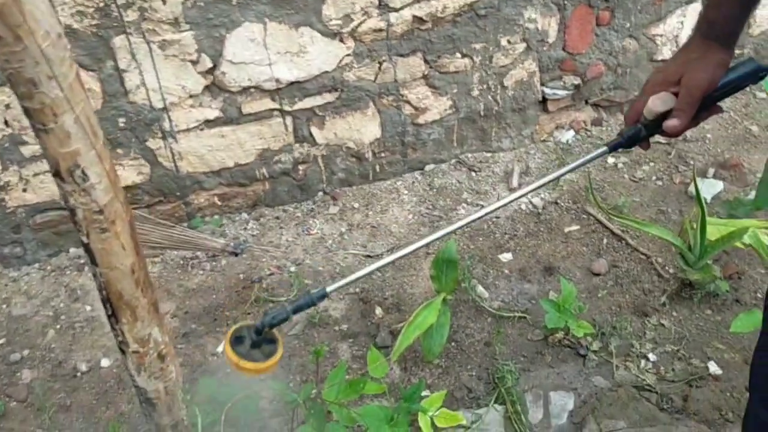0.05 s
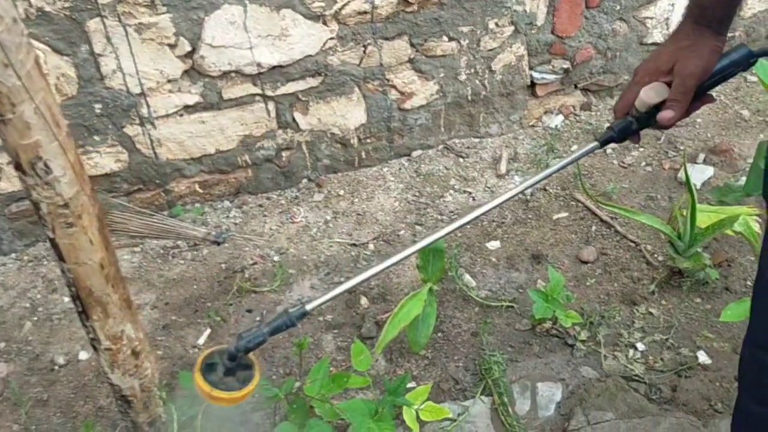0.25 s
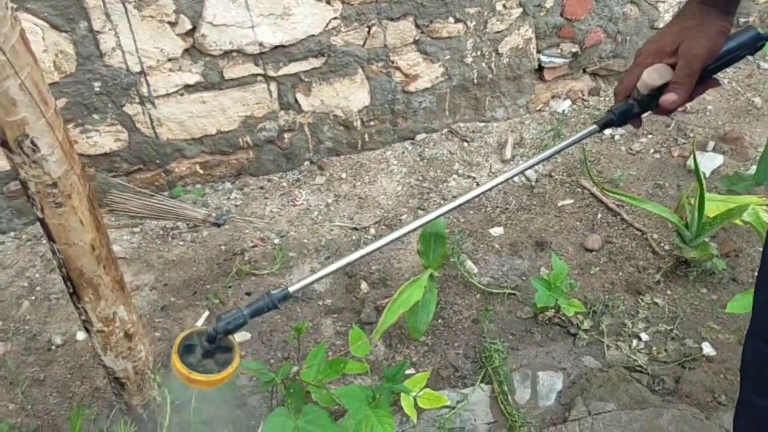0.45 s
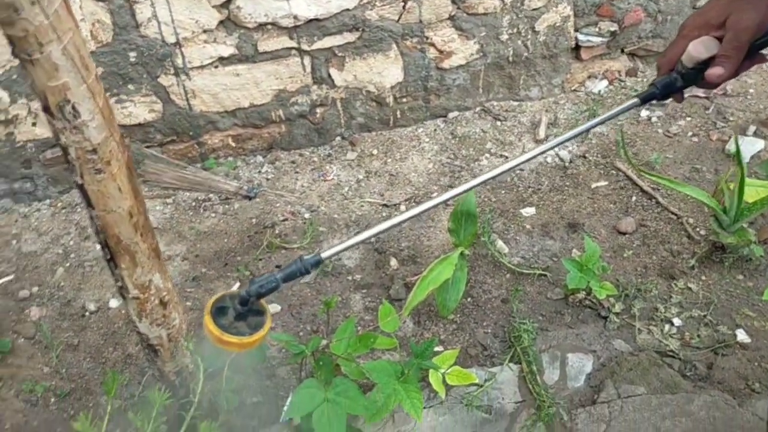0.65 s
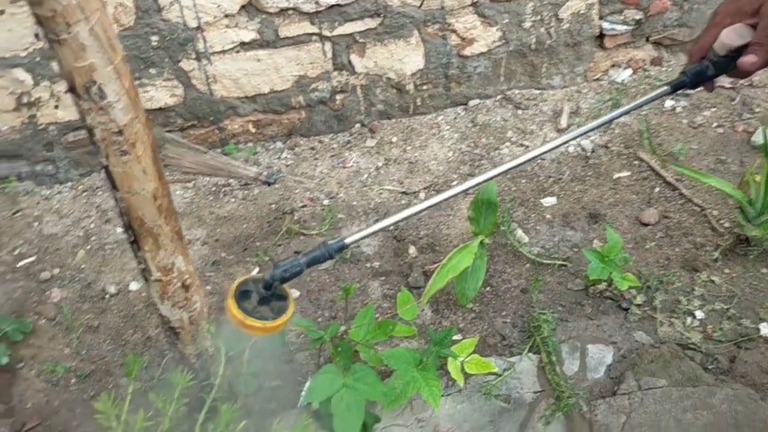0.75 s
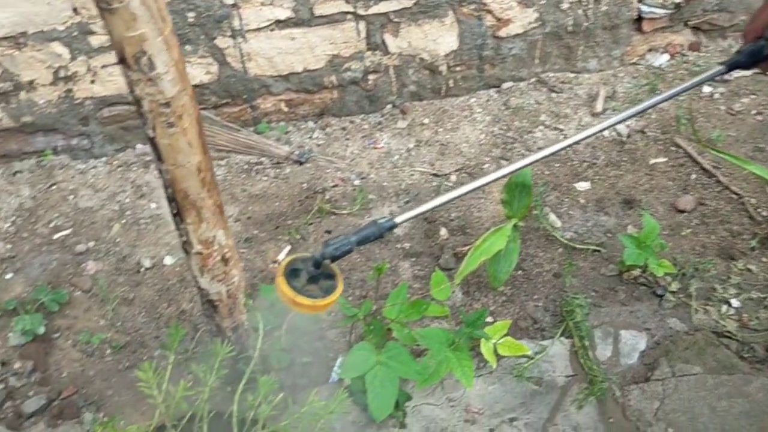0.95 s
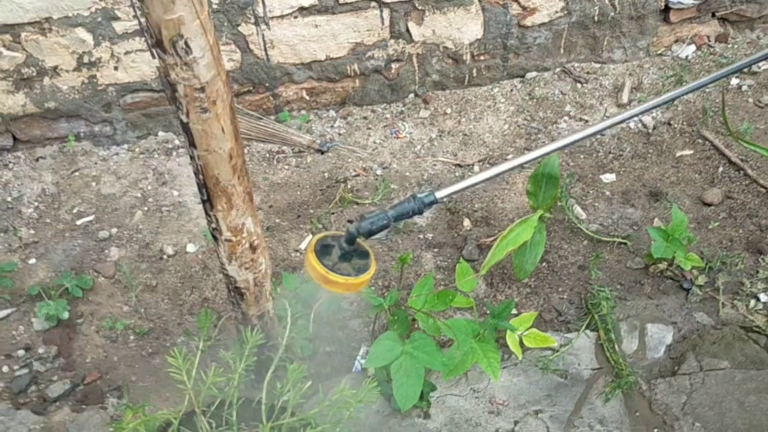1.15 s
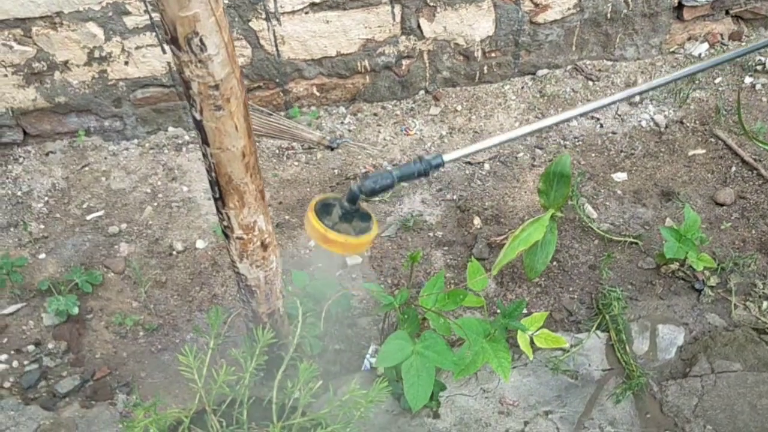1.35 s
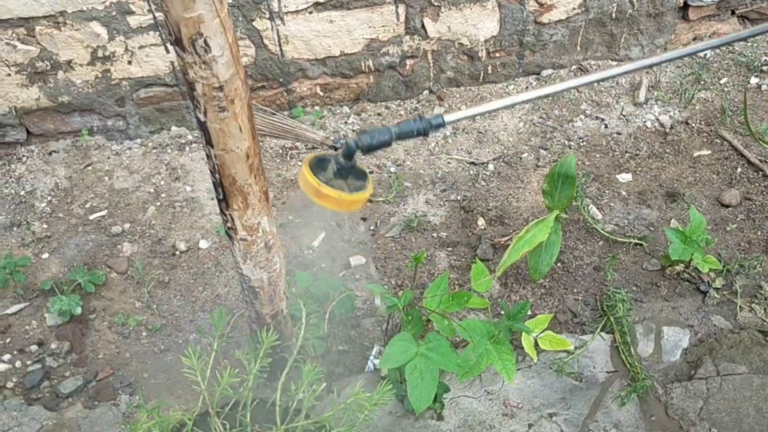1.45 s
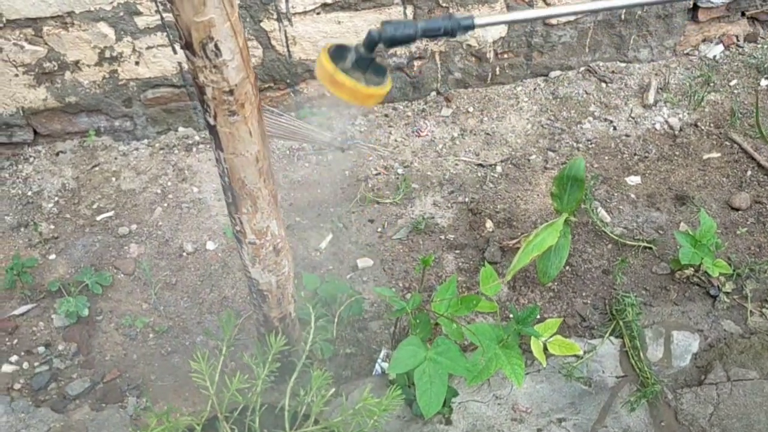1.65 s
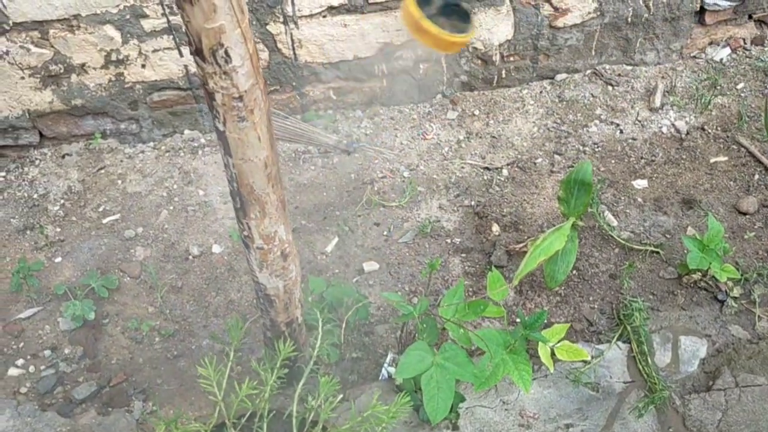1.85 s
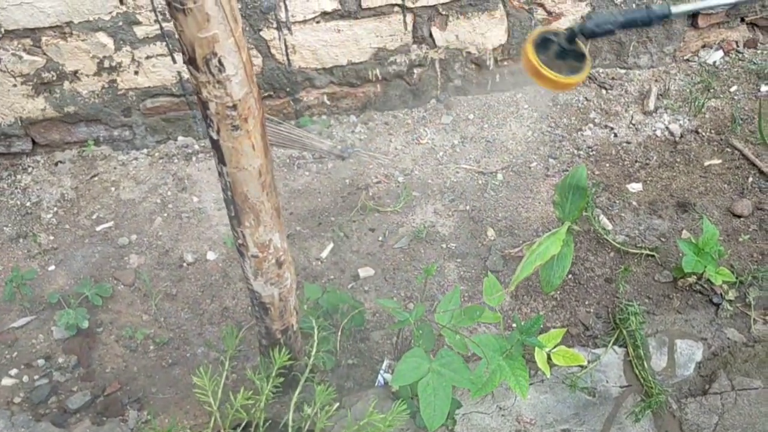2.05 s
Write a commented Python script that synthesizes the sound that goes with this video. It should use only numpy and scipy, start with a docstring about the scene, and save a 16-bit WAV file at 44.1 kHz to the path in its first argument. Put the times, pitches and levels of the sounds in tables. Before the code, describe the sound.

A small electric sprayer pump buzzes throughout the two seconds, a fast, even ticking hum with a soft hiss of mist. At about 0.3 seconds the wand clacks twice and the tank bumps dully. The spray hisses harder from then until about 0.7 seconds. A few faint knocks fall between 0.6 and 1.2 seconds. A low outdoor rumble lies underneath, with no echo.

```python
"""The rapid beat of a small electric diaphragm pump, about 45 strokes a second, driving a garden sprayer.
Each stroke thuds in the housing and ticks in the valves; the tank hums and the nozzle hisses mist.
Early on the lance clacks twice and the jet hisses harder for a while; the tank bumps and a few
light knocks follow. Outdoors among plants: one microphone, no echo, a low rumble underneath."""
import sys
import numpy as np
from scipy import signal
from scipy.fft import rfft, irfft
from scipy.io import wavfile

SR = 44100
rng = np.random.default_rng(int(sys.argv[2]) if len(sys.argv) > 2 else 0)


def output_pcm(signal):
    """Save a mono or channel-first signal as 16-bit PCM at the path in sys.argv[1].

    Samples are clipped to [-1, 1] before scaling.
    """
    pcm = np.clip(np.atleast_2d(signal).T, -1, 1) * 32767
    wavfile.write(sys.argv[1], SR, np.round(pcm).astype(np.int16))


N = 92610
TIME = np.arange(N) / SR

# housing and upper hum, as the sprayer is moved about: time_s, gain_db
PUMP_LEVEL = [(0, -3), (.18, -0.5), (.45, 0), (.62, 0.5), (.9, -2), (1.25, 0), (1.5, -2), (1.8, -4),
              (1.95, -1), (2.1, -2.5)]
# valve ticks and gush of water: time_s, gain_db
VALVE_LEVEL = [(0, -1), (.18, 2.5), (.45, 4), (.62, 4.5), (.9, 4), (1.25, 3), (1.5, 1), (1.8, -1),
               (1.95, 1.5), (2.1, -0.5)]
# clacks of the lance: start_s, gain_db, ringing_gain, treble_db
CLACKS = [(0.251, -5, 1, 1), (0.2543, 0.5, 0.75, 0), (0.264, -10.5, .35, 8), (0.2713, -7, 0.41, -1),
          (0.2844, -6.5, 0.56, -2), (0.3232, -6, 0.58, -6), (0.3321, -11, 0.25, -13),
          (0.3663, -17, 0.27, 4.5), (1.581, -22, 0.55, 2)]


def from_db(db):
    """Decibels to gain."""
    return 10 ** (np.asarray(db) / 20)


def curve(rows):
    """Straight lines in time through the rows."""
    return np.interp(TIME, *np.transpose(rows))


def butter(x, order, edges_hz, kind):
    """Butterworth filter: low, high or band pass."""
    return signal.sosfilt(signal.butter(order, edges_hz, kind, fs=SR, output="sos"), x)


def noise(spectrum):
    """Noise of rms 1 with the given colour, falling away beyond its ends."""
    hz, db = np.transpose(spectrum)
    f = np.maximum(np.arange(N // 2 + 1) * SR / N, 1)
    colour = from_db(np.interp(np.log(f), np.log(hz), db))
    skirts = np.minimum(f / hz[0], 1) ** 2 * np.minimum(hz[-1] / f, 1) ** 2
    x = irfft(rfft(rng.standard_normal(N)) * colour * skirts, N)
    return x / x.std()


def drift(rate_hz):
    """Random wander of spread 1, mostly slower than the rate."""
    f = np.arange(N // 2 + 1) * SR / N
    x = irfft(rfft(rng.standard_normal(N)) / (1 + (f / rate_hz) ** 2), N)
    return (x - x.mean()) / x.std()


def clicks(times, gains):
    """One impulse at each time."""
    at = np.round(np.asarray(times) * SR).astype(int)
    inside = (at >= 0) & (at < N)
    return np.bincount(at[inside], (gains * np.ones(len(at)))[inside], N)


def ring(hits, hz, t60, rise_s):
    """A mode that swells quickly and dies away after every impulse."""
    envelope = np.exp(-np.log(1000) * TIME / t60) * (1 - np.exp(-TIME / rise_s))
    return signal.fftconvolve(hits, np.sin(2 * np.pi * hz * TIME) * envelope)[:N]


def strike(times, gains, modes, rise_s, spread_db):
    """Blows on a body; each meets every mode with a strength of its own."""
    out = 0
    for hz, db, t60 in modes:
        strengths = gains * from_db(db + spread_db * rng.standard_normal(len(times)))
        out += ring(clicks(times, strengths), hz, t60, rise_s)
    return out


def bursts(times, gains, decay_s):
    """An envelope that jumps at each time and decays; overlaps add in power."""
    feedback = np.exp(-2 / (decay_s * SR))
    power = signal.lfilter([1], [1, -feedback], clicks(times, gains ** 2) + 1e-18)
    return np.sqrt(power)


def surge(strokes, depth):
    """A gain around 1 that jumps with every stroke."""
    pulses = bursts(strokes, 1, decay_s=0.0054)
    return 1 + depth * (pulses / pulses.mean() - 1)


def rumble():
    """Low outdoor rumble with two brief swells."""
    spectrum = [(30, -34.5), (62, -34), (90, -19.5), (135, -1), (230, 5), (340, -3), (600, -2.5),
                (1200, -17.5)]  # its colour: frequency_hz, density_db
    level = [(0, -38), (.18, -45), (.25, -24.5), (.3, -32), (.4, -34.5), (.48, -36), (.8, -40),
             (1.08, -42.5), (1.17, -32.5), (1.27, -44), (1.7, -43), (2.1, -45.5)]  # its course: time_s, level_db
    return noise(spectrum) * from_db(curve(level))


def knocks():
    """Light knocks: a tick and a hollow body, rounded off by the softness of the contact."""
    blows = [(0.6318, -17, -13, 8000), (0.6436, -25, -28, 4000), (0.791, -15, -17.5, 1300),
             (.8015, -34, -26, 1200), (0.9344, -16, -26, 2800), (1.1263, -13.5, -23, 2300),
             (1.1386, -21, -27, 4500)]  # each contact: start_s, tick_db, body_db, cutoff_hz
    tick_modes = [(1470, -1.5, 0.0053), (1960, 1, 0.0031), (3060, -3.5, 0.0017), (3970, 1, .004),
                  (5280, 1, 0.0023)]  # bright, short modes: pitch_hz, gain_db, t60_s
    body_modes = [(276, -0.37, 0.013), (672, -1.1, 0.011)]  # hollow modes: pitch_hz, gain_db, t60_s
    out = 0
    for start_s, tick_db, body_db, cutoff_hz in blows:
        hit = 0
        for db, modes in ((tick_db, tick_modes), (body_db, body_modes)):
            for k, (hz, mode_db, t60) in enumerate(modes):
                impulse = clicks([start_s], from_db(db + mode_db))
                hit -= (-1) ** k * ring(impulse, hz, t60, rise_s=0.00005)  # modes alternate in sign
        out += butter(hit, 2, cutoff_hz, "low")
    return out


def tank_bumps():
    """Each dull bump rings one low mode of the tank."""
    bumps = [(.21, -9.5, 160, 0.068), (0.244, -21, 152.4, 0.41), (0.317, -17, 145, 0.11),
             (0.355, -15.5, 162.4, 0.08), (0.399, -14.5, 156, 0.078), (0.637, -18.5, 139, 0.037),
             (0.79, -27, 133.3, 0.19), (0.93, -26, 131, 0.066), (1.136, -24, 154, 0.099),
             (1.152, -23.5, 271, 0.09)]  # blows on the tank: start_s, level_db, pitch_hz, t60_s
    return sum(ring(clicks([s], from_db(db)), hz, t60, rise_s=0.0065) for s, db, hz, t60 in bumps)


def lance():
    """Each clack is a crack, ringing modes and a rattling tail, with a brightness of its own."""
    modes = [(421, -25, .16), (676, -22, .09), (1098, -26, .13), (1349, -18.5, .07), (1483, -20, .09),
             (1860, -26, .11), (2282, -30, .1), (2690, -11, .035), (2850, -19, .04), (3171, -24, .08),
             (4550, -28, .05), (4780, -28, .05), (5350, -21, .035), (5680, -21, .035)]  # modes of the lance: pitch_hz, gain_db, t60_s
    crack_spectrum = [(200, -14), (700, 3), (950, -8.5), (1350, 7), (2000, -14), (2750, 11.5), (3500, -3.5),
                      (4300, -3), (5400, 4), (6200, -7.5), (7000, -38)]  # colour of the impact: frequency_hz, density_db
    tail_spectrum = [(200, -23.5), (700, -1.5), (1400, -4.5), (2000, -0.5), (2900, 4.5), (3900, -4.5),
                     (4400, -12), (6500, -30)]  # colour of the rattle: frequency_hz, density_db
    treble_hz = 4200
    crack = from_db(-12) * noise(crack_spectrum)
    tail = from_db(-27) * noise(tail_spectrum)
    out = 0
    for start_s, db, ringing, treble_db in CLACKS:
        hit = crack * bursts([start_s], 1, decay_s=0.0054)
        hit += strike([start_s], ringing, modes, rise_s=0.0005, spread_db=4)
        low = butter(hit, 5, treble_hz, "low")
        high = butter(hit, 5, treble_hz, "high") * from_db(treble_db)
        rattle = tail * bursts([start_s], 0.93, decay_s=0.037)
        out += from_db(db) * (low + high + rattle)
    return out


def mist(strokes):
    """Grainy mist from the nozzle, pulsing faintly; it changes colour at the first clack."""
    thin = [(400, -9.5), (750, 3), (1050, -0.5), (1350, -9), (2200, 2), (2700, 6.5), (3200, 3),
            (3700, -12.5), (4500, -5.5), (5200, -0.5), (6100, -2.5), (7000, -24)]  # hiss before the clack: frequency_hz, density_db
    full = [(400, -13), (750, -4.5), (1200, -2), (1900, -3.5), (2300, -2), (2700, 4.5), (3200, -0.5),
            (3700, -2.5), (4600, -5), (5300, -6), (6200, -5.5), (8000, -26.5)]  # hiss after it: frequency_hz, density_db
    level = [(0, -38.5), (.2, -35.5), (.5, -39.5), (.9, -39), (1.3, -39), (1.7, -40.5), (2.1, -41)]  # course of the mist: time_s, level_db
    hiss = np.where(TIME < CLACKS[0][0], noise(thin), noise(full))
    grain_db = 1.1 * drift(rate_hz=380)
    return hiss * from_db(curve(level) + grain_db) * surge(strokes, depth=0.029)


def jet(strokes):
    """Resonant hiss of the jet, surging with the strokes; strongest just after the first clacks."""
    spectrum = [(1200, -19), (2200, -16), (2700, -6), (3300, -2), (3930, 0), (4130, -14), (4500, -18),
                (4800, -22), (6000, -21), (7000, -22), (7450, -18), (8000, -20)]  # its colour: frequency_hz, density_db
    level = [(0, -65), (.24, -65.5), (.285, -34), (.318, -34.5), (.33, -22), (.36, -31), (.43, -33.5),
             (.57, -32.5), (.695, -36), (.72, -39.5), (.9, -48), (1.6, -47.5), (2.1, -50)]  # its course: time_s, level_db
    return noise(spectrum) * from_db(curve(level)) * surge(strokes, depth=0.2)


def tank_hum(turns):
    """The tank hums at multiples of the stroke rate, each tone wavering on its own."""
    harmonics = [(2, -59.5), (3, -44.5), (4, -47.5), (5, -42.5), (6, -49.5), (7, -53.5), (8, -51.5),
                 (11, -51), (12, -47.5), (13, -47), (14, -47), (17, -54), (18, -50.5), (20, -58.5),
                 (22, -55)]  # tones of the tank: stroke_multiple, level_db
    low_level = [(0, -10), (.18, -1), (.45, 0.5), (.62, -2), (.9, 3), (1.25, -2), (1.45, 2.5), (1.6, -1.5),
                 (1.82, -5), (1.95, 1), (2.1, 0)]  # course of the low tones: time_s, gain_db
    waver_db, upper_lag_strokes = 0.94, 0.078
    out = 0
    for multiple, db in harmonics:
        is_low = multiple < 10
        level_db = db + curve(low_level if is_low else PUMP_LEVEL) + waver_db * drift(rate_hz=2.1)
        lag = rng.random() if is_low else upper_lag_strokes
        out += np.sqrt(2) * from_db(level_db) * np.sin(2 * np.pi * multiple * (turns - lag))
    return out


def gush(strokes):
    """A short gush of water on every stroke."""
    spectrum = [(300, -10), (620, -8.5), (1100, -11), (2100, -11), (2700, 3.5), (3400, 0.5), (3900, -9),
                (4700, -7), (5300, -6.5), (6000, 0), (7000, -10)]  # its colour: frequency_hz, density_db
    spurts = from_db(-40) * bursts(strokes, 0.8, decay_s=0.0034)
    return noise(spectrum) * spurts * from_db(curve(VALVE_LEVEL))


def pump(strokes):
    """Three contacts in every stroke set the housing thudding and the valves ticking."""
    contacts = [(0, -0.5, 6), (.0052, -16.5, -20), (.0098, -21, -2.5)]  # within one stroke: delay_s, housing_db, valve_db
    housing_modes = [(478, -29.5, 0.019), (608.3, -26.5, 0.026), (770, -35.5, .014)]  # thud of the housing: pitch_hz, gain_db, t60_s
    valve_modes = [(2723, -24.5, 0.0047), (2920, -34, 0.0076), (3300, -25, 0.0065), (3475, -33, 0.0053)]  # tick of the valves: pitch_hz, gain_db, t60_s
    jitter_s, housing_lag_s, spread_db = 0.00006, 0.00033, 1.73
    housing_band_hz, valve_band_hz = (297, 950), (2503, 3430)
    housing_rise_s, valve_rise_s = 0.00054, 0.00045
    thuds = ticks = 0
    for delay_s, housing_db, valve_db in contacts:
        times = strokes + delay_s + jitter_s * rng.standard_normal(len(strokes))
        thuds += strike(times + housing_lag_s, from_db(housing_db), housing_modes, housing_rise_s, spread_db)
        ticks += strike(times, from_db(valve_db), valve_modes, valve_rise_s, spread_db)
    housing = butter(thuds, 2, housing_band_hz, "band") * from_db(curve(PUMP_LEVEL))
    valves = butter(ticks, 3, valve_band_hz, "band") * from_db(curve(VALVE_LEVEL))
    return housing + valves


def scene():
    """Pump, spray and handling over a low rumble, in mono; the motor times the strokes."""
    motor_speed = [(0, 45.1), (.3, 44.72), (1.2, 44.7), (1.6, 44.57), (1.95, 44.78)]  # pace of the motor: time_s, stroke_rate_hz
    first_stroke_s = 0.0181
    rate_hz = curve(motor_speed)
    turns = np.cumsum(rate_hz) / SR - first_stroke_s * rate_hz[0]
    strokes = np.interp(np.arange(int(turns[-1]) + 1), turns, TIME)  # one at each whole turn
    background = rumble()
    machine = pump(strokes) + tank_hum(turns) + gush(strokes)
    spray = mist(strokes) + jet(strokes)
    handling = lance() + tank_bumps() + knocks()
    return (background + machine + spray + handling)[None]


def record(dry):
    """The microphone drops the deep bass and the top."""
    bottom_hz, top_hz, stopband_hz = 95, 6090, 8300
    x = butter(dry, 6, bottom_hz, "high")
    x = butter(x, 10, top_hz, "low")
    return signal.sosfilt(signal.cheby2(12, 50, stopband_hz, fs=SR, output="sos"), x)


dry = scene()
out = record(dry)
output_pcm(out)
```